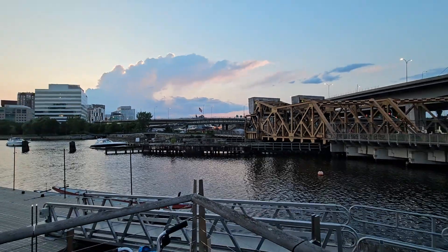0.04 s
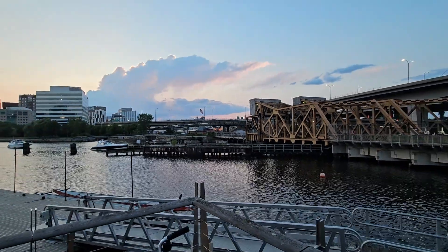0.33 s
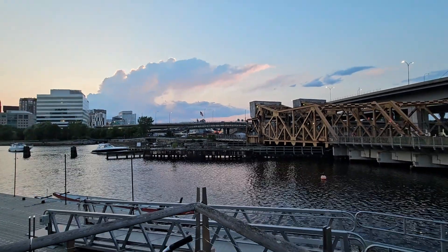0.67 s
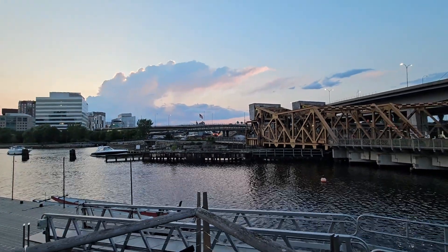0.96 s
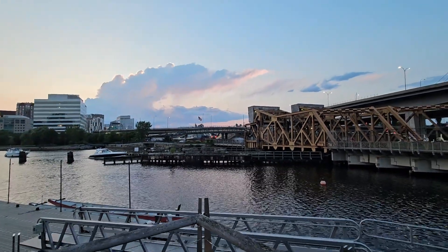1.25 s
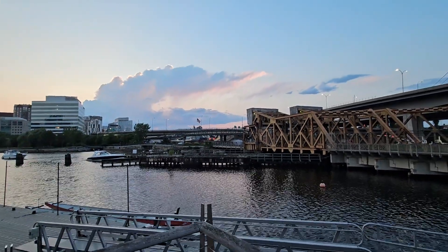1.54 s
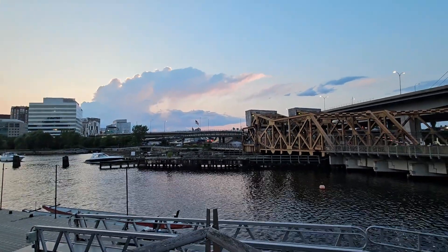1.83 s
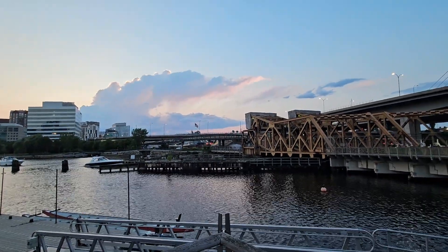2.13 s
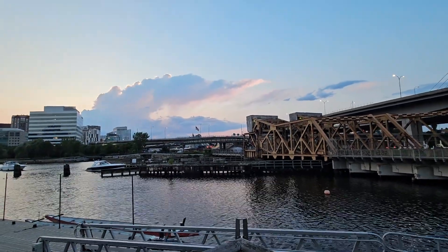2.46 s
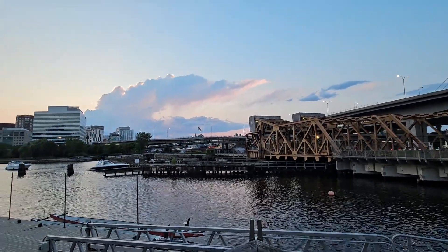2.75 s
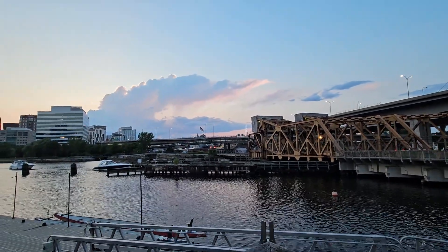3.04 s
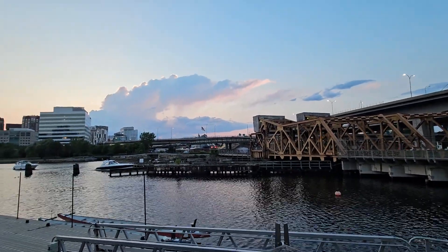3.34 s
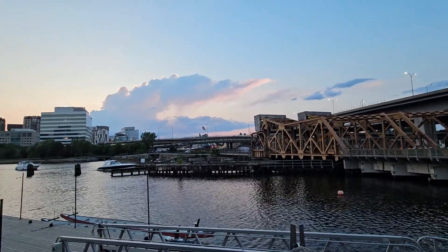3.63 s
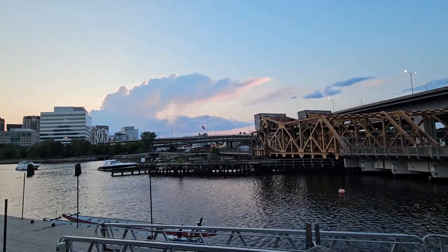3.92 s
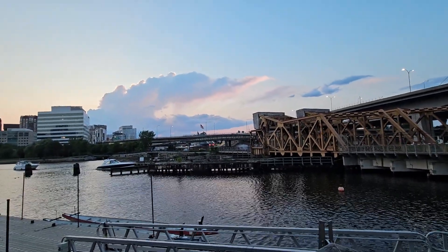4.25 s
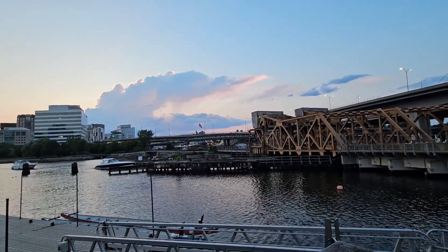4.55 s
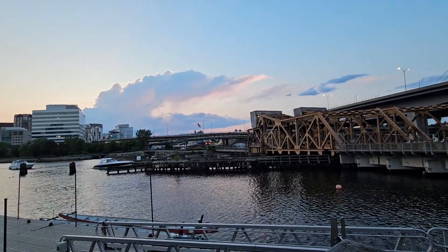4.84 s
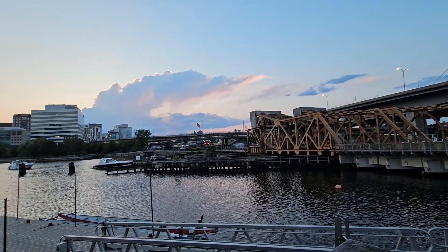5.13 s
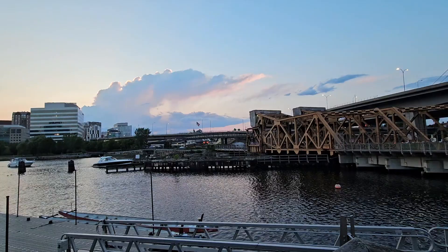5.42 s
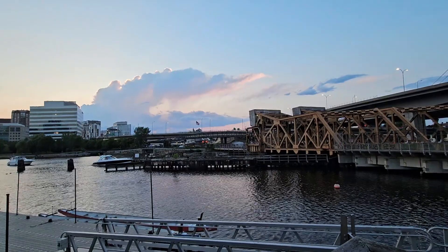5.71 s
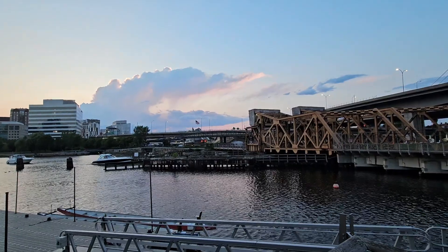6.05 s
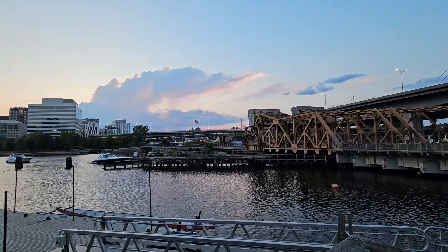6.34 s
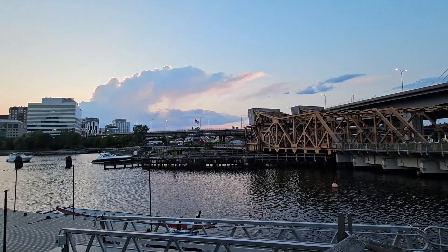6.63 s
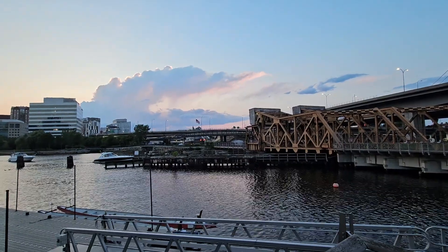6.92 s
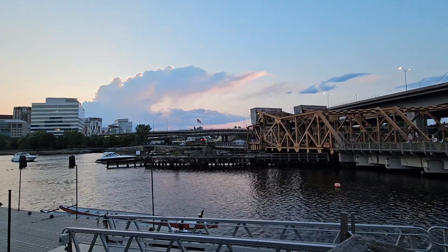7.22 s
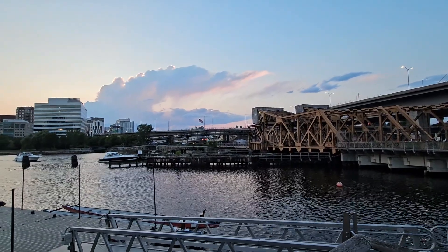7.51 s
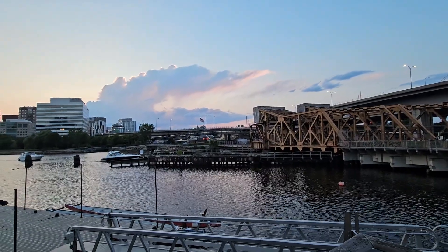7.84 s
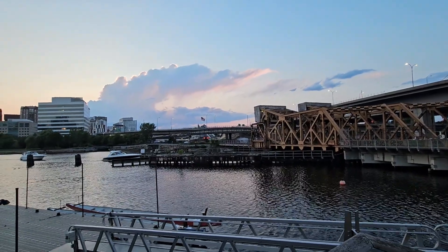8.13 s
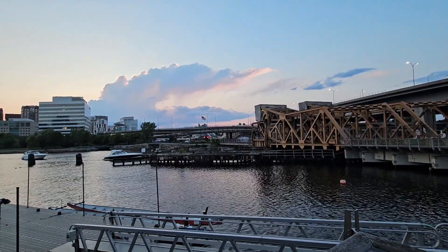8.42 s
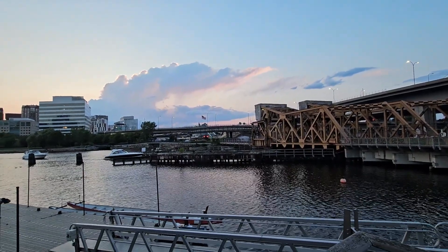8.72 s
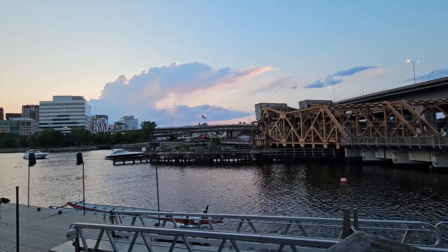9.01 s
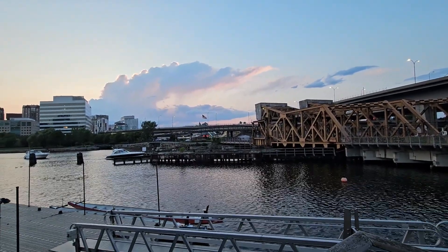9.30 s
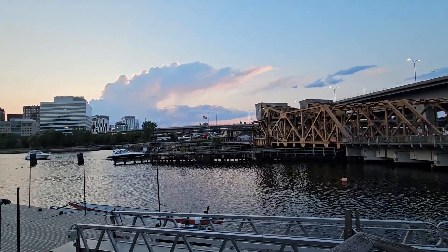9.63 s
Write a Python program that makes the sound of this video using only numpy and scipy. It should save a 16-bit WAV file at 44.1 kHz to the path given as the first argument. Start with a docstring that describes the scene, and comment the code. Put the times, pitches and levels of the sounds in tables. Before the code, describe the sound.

On a city riverbank, a heavy engine drones far away, fading in and out over deep traffic rumble and a steady wash of streets. Tyres swish along a highway bridge on the right. Low booms come early, then scattered knocks of wheels crossing a joint, with the strongest cluster near the end. Faint distant squeals and small ticks, pings and rustles near the microphone dot the stereo background.

```python
"""River bank by a highway bridge

City dusk, in stereo from the bank. A heavy engine drones far off, fading in and out on the air, over
low traffic rumble. Tyres wash in from the bridge on the right and now and then knock over a joint.
Thin pings, ticks, rustles and scuffs sound near the microphone, squeals and faint twitter farther out,
and behind it all lies the wash of the streets."""
import sys
import numpy as np
from scipy import signal
from scipy.fft import rfft, irfft, next_fast_len
from scipy.io import wavfile

SR = 44100
rng = np.random.default_rng(int(sys.argv[2]) if len(sys.argv) > 2 else 0)


def unload_wav(signal):
    """Save mono or channel-first audio to the path in sys.argv[1] as 16-bit WAV at rate SR, clipped to [-1, 1]."""
    wavfile.write(
        sys.argv[1],
        SR,
        np.round(np.clip(np.atleast_2d(signal).T, -1, 1) * 32767).astype(np.int16),
    )


N = 426447
T = np.arange(N) / SR
FROM_MIDDLE_S = T - T.mean()
FREQS = np.maximum(np.arange(N // 2 + 1) * SR / N, 1)
FFT_SIZE = next_fast_len(N, True)
FFT_HZ = np.arange(FFT_SIZE // 2 + 1) * SR / FFT_SIZE


def undb(db):
    """Decibels to gain."""
    return 10 ** (np.asarray(db) / 20)


def unit(x):
    """Scale to rms 1."""
    return x / np.sqrt(np.mean(x ** 2))


def pan(db):
    """Gains of the two sides, the left db louder than the right."""
    return undb(np.vstack([db / 2, -db / 2]))


def curves(table):
    """The columns of a curve table, one value a sample."""
    seconds, *columns = np.transpose(table)
    return [np.interp(T, seconds, column) for column in columns]


def walk(rate):
    """Smooth chance with spread 1, changing about rate times a second."""
    spectrum = rfft(rng.standard_normal(FFT_SIZE)) / (1 + (FFT_HZ / rate) ** 4)
    return unit(irfft(spectrum, FFT_SIZE))[:N]


def colour(points):
    """Gain at each frequency from (Hz, dB) points."""
    hz, db = np.transpose(points)
    return undb(np.interp(np.log(FREQS), np.log(hz), db, left=-90, right=-90))


def resonance(hz, width_hz):
    """Gain at each frequency of a steep-sided resonance."""
    return 1 / (1 + ((FREQS ** 2 - hz ** 2) / (FREQS * width_hz)) ** 2)


def resonances(bands):
    """Summed gain of (Hz, width Hz, dB) resonances."""
    return sum(undb(db) * resonance(hz, width) for hz, width, db in bands)


def stereo_spectrum(size, likeness, lag_ms):
    """White noise spectra; likeness is the share common to both sides, reaching the left lag_ms late."""
    hz = np.arange(size // 2 + 1) * SR / size
    common, *apart = rfft(rng.standard_normal((3, size)))
    direct = np.array([common * np.exp(-2j * np.pi * hz * lag_ms / 1000), common])
    return np.sqrt(likeness) * direct + np.sqrt(1 - likeness) * np.array(apart)


def noise(gain, likeness=0, lag_ms=0, pan_db=0):
    """Steady coloured stereo noise of rms 1."""
    share = np.interp(FFT_HZ, FREQS, np.broadcast_to(likeness, FREQS.shape))
    spectrum = stereo_spectrum(FFT_SIZE, share, lag_ms) * np.interp(FFT_HZ, FREQS, gain)
    return unit(irfft(spectrum, FFT_SIZE)[:, :N] * pan(pan_db))


def burst(start_s, gain, db, t60, rise_s, pan_db=0, likeness=0, lag_ms=0):
    """A track with one burst of coloured noise that swells, then dies by 60 dB in t60 seconds."""
    t, hz = np.arange(SR) / SR, np.arange(SR // 2 + 1)
    ring = unit(irfft(stereo_spectrum(SR, likeness, lag_ms) * np.interp(hz, FREQS, gain)))
    envelope = (1 - np.exp(-t / rise_s)) * undb(db - 60 * t / t60)
    start = int(start_s * SR)
    out = np.zeros((2, N))
    out[:, start:start + SR] = (ring * envelope * pan(pan_db))[:, :N - start]
    return out


def turning(hz, wander_hz, rate):
    """Phase of a machine whose speed wanders a little."""
    return 2 * np.pi * (np.cumsum(hz + wander_hz * walk(rate)) / SR + rng.random())


def nearness(closest_s, rise_s, fall_s):
    """Gain of a source that comes closest and leaves again."""
    return 1 / (1 + ((T - closest_s) / np.where(T < closest_s, rise_s, fall_s)) ** 2)


# The far engine's firing tone and its octave as they reach the bank.
# Each row: time in seconds, relative level in dB.
FIRING_FADES = [(0, -24), (0.2, -29), (0.42, -36.5), (0.66, -29.5), (0.74, -24.5), (0.9, -21.5),
                (1.25, -16), (1.52, -15), (1.6, -17.5), (1.88, -14.5), (2.06, -15), (2.10, -20.5),
                (2.35, -23.5), (2.87, -23), (3.0, -29), (3.35, -28), (3.68, -27.5), (3.72, -22),
                (3.86, -25), (4.42, -22), (4.46, -37), (4.52, -31.5), (4.58, -36), (4.66, -24),
                (4.87, -25.5), (5.45, -20), (5.56, -17.5), (5.86, -19.5), (5.95, -25.5), (6.17, -20.5),
                (6.95, -28), (7.1, -38), (7.25, -44), (7.4, -30.5), (7.68, -23), (8.29, -18), (9.37, -17),
                (9.67, -18)]
OCTAVE_FADES = [(0, -45), (0.6, -39), (1.3, -48.5), (1.8, -33), (2.15, -36.5), (2.37, -42), (2.62, -33.5),
                (3.1, -33), (4.0, -42.5), (4.6, -62), (5.6, -29.5), (6.35, -33), (6.7, -40), (7.6, -39),
                (7.85, -33.5), (8.3, -31.5), (8.8, -38.5), (9.67, -35)]
# Its weaker overtones. Each row: multiple of the firing tone, level midway through in dB.
OVERTONES = [(3, -50.5), (4, -56.5), (5, -63)]
FIRING_HZ = 90.1


def engine_drone(scatter_db=-38, clearing_db_per_s=0.63):
    """A far heavy engine: tone and octave fade separately as their paths over the water interfere."""
    (tone_db,), (octave_db,) = curves(FIRING_FADES), curves(OCTAVE_FADES)
    phase = turning(FIRING_HZ, wander_hz=.1, rate=1.31) + np.array([[-.105], [.105]])  # right side first
    out = undb(tone_db + 0.5 * walk(18)) * np.sin(phase)
    out += undb(octave_db - 1.9) * np.sin(2 * phase)
    # A weaker, wavering path over the water beats against the direct tone.
    out += undb(scatter_db) * (walk(15) * np.sin(phase) + walk(15) * np.cos(phase)) / np.sqrt(2)
    for multiple, db in OVERTONES:
        level_db = db + clearing_db_per_s * FROM_MIDDLE_S + 1.5 * walk(4.8)
        out += undb(level_db) * np.sin(multiple * phase)
    sway_db = .55 + .3 * walk(.7)  # the tone drifts a little between the sides
    return np.sqrt(2) * out * pan(sway_db)


# The deep rumble at the bank, steady between its lulls. Each row: time in seconds, relative level in dB.
RUMBLE_LEVEL = [(0, -45), (0.2, -33), (0.7, -27.5), (1.52, -26), (1.62, -38), (1.85, -26), (2.06, -24.5),
                (2.2, -47), (2.52, -45), (2.8, -23.5), (3.2, -34), (3.5, -32.5), (4.07, -43.5),
                (4.5, -40.5), (5.2, -44.5), (5.3, -33), (5.6, -28.5), (5.85, -26.5), (5.98, -35.5),
                (6.3, -28.5), (7.0, -28), (7.6, -28), (9.67, -29.5)]
# Far exhaust noise, deep and upper. Each row: frequency in Hz, relative level in dB.
DEEP_SPECTRUM = [(15, -19.5), (28, -7), (42, 1), (70, 1.5), (95, -11), (130, -20.5), (250, -55.5)]
UPPER_SPECTRUM = [(60, -18), (105, -1), (165, -0.5), (250, -6.5), (300, -12), (600, -23), (1500, -58.5)]
# Other engines humming in the distance. Each row: pitch in Hz, base level in dB.
ENGINE_HUMS = [(29, -46), (42.6, -28.5), (57.5, -34.5), (69, -41), (112.5, -49.5), (137, -50.5), (156, -46),
               (218, -50), (240, -52), (337, -56.5)]
# Heavy vehicles swelling in the low mids. Each row: loudest moment, rise and fall in seconds,
# centre and width in Hz, peak level in dB.
TRUCKS = [(1.5, 0.45, 0.56, 512, 29.95, -51.5), (2.72, 0.16, 0.19, 328.5, 129, -42),
          (4.4, .4, .5, 384, 59.8, -52)]
NO_LULL_DB, BUSIER_DB_PER_S = -25.5, 0.2151  # the bridge slowly gets busier


def traffic_rumble(upper_lull_share=0.28):
    """Exhaust noise and hums of far vehicles sink together in lulls; long waves reach both sides alike."""
    (deep_db,) = curves(RUMBLE_LEVEL)
    lull_db = deep_db - NO_LULL_DB
    deep = noise(colour(DEEP_SPECTRUM), likeness=0.9, lag_ms=0.21, pan_db=2)
    deep *= undb(deep_db - 3.5 + 0.6 * walk(6))
    upper = noise(colour(UPPER_SPECTRUM), likeness=0.88, lag_ms=0.25)
    upper *= undb(-34.5 + 0.2 * FROM_MIDDLE_S + upper_lull_share * lull_db + 1.3 * walk(13))
    out = deep + upper
    for hz, db in ENGINE_HUMS:
        lull_share = 1 if hz < FIRING_HZ else upper_lull_share
        swell_db = lull_share * lull_db + BUSIER_DB_PER_S * FROM_MIDDLE_S + 0.38 * walk(2.9)
        out += undb(db + swell_db) * np.sqrt(2) * np.sin(turning(hz, wander_hz=0.25, rate=0.81))
    for s, rise, fall, hz, width, db in TRUCKS:
        truck = noise(resonance(hz, width), likeness=0.81, lag_ms=0.25)
        out += truck * undb(db) * nearness(s, rise, fall)
    return out


# Tyre roar and hiss, heard from beside the bridge. Each row: frequency in Hz, relative level in dB.
ROAR_SPECTRUM = [(150, -18), (400, 2), (600, -2), (800, 4.5), (1100, 1), (1270, 3.5), (1460, 1), (1750, 0),
                 (2050, -1.5), (2500, -10), (3200, -17), (5000, -46)]
HISS_SPECTRUM = [(1200, -13.5), (2500, 4), (4300, 2.5), (6000, -5.5), (8500, -6.5), (10000, -28.5),
                 (15000, -33)]
# The whine of the tread. Each row: centre and width in Hz, relative level in dB.
TREAD_BANDS = [(1970, 98, 1), (2820, 590, -12.5)]
# Single vehicles standing out on the bridge. Each row: loudest moment, rise and fall in seconds,
# then levels of roar, hiss and whine in dB.
PASSES = [(4.42, 0.11, 0.35, -41.5, -55, -51.5), (5.88, 0.31, 0.33, -43, -69, -51),
          (7.72, 0.11, 0.09, -48.5, -64, -54), (8.5, 0.31, 0.8, -49, -57, -58)]


def tyres(steady_roar_db=-42.5, steady_hiss_db=-59):
    """Tyres roll over the bridge on the right; each pass adds its power to the steady flow."""
    flow = undb(BUSIER_DB_PER_S * FROM_MIDDLE_S)
    power = np.outer([undb(steady_roar_db), undb(steady_hiss_db), 0], flow) ** 2
    for s, rise, fall, *levels_db in PASSES:
        power += np.outer(undb(levels_db), nearness(s, rise, fall)) ** 2
    roar_gain, hiss_gain, whine_gain = np.sqrt(power)
    direct_share = 1 / (1 + (FREQS / 2100) ** 6)  # the higher the roar, the more scattered it arrives
    roar = noise(colour(ROAR_SPECTRUM), direct_share, lag_ms=0.37, pan_db=-6) * undb(0.65 * walk(11))
    hiss = noise(colour(HISS_SPECTRUM), likeness=0.024, pan_db=0.1) * undb(1.1 * walk(7.6))
    whine = noise(resonances(TREAD_BANDS), pan_db=-10.5)
    return roar * roar_gain + hiss * hiss_gain + whine * whine_gain


# Wheels crossing a joint up on the bridge. Each row: start in seconds, levels of deck ring, dull body
# and plate clank in dB, decay time in seconds.
JOINT_HITS = [(2.61, -56, -44, -70, .7), (3.1, -60, -34, -71, .4), (5.03, -42, -60, -71, 0.95),
              (5.36, -37.5, -54, -63, 0.47), (6.37, -34, -48, -60, 0.25), (6.48, -39, -33, -60, 0.39),
              (8.99, -36, -55, -70, 0.23), (9.085, -36, -42.5, -70, 0.45), (9.12, -32.5, -26, -36, 0.31),
              (9.17, -35, -33.5, -59, 0.35), (9.225, -45, -28.5, -59, 0.33), (9.32, -40, -50, -70, .25)]
# Modes of the deck and the joint's steel plate. Each row: centre and width in Hz, relative level in dB.
DECK_MODES = [(615, 130, -1), (780, 86, 2.5), (1020, 120, -11), (1280, 120, -13.5)]
PLATE_MODES = [(1520, 180, -3.5), (1850, 180, -3.5), (2080, 110, 1)]
# The dull body of a knock. Each row: frequency in Hz, relative level in dB.
BODY_SPECTRUM = [(130, -13), (245, 15.5), (320, 2.5), (450, 0), (620, 1.5), (950, -8.5), (1500, -12),
                 (2100, -16.5), (2800, -34)]
# Deep booms under heavy loads. Each row: start in seconds, level in dB.
BOOMS = [(1.489, -27), (1.729, -23), (2.031, -25), (3.155, -20), (4.471, -30)]


def joint_knocks():
    """Wheels strike a joint: the deck rings, a hard hit clanks the plate, heavy loads make it boom."""
    deck, plate, body = resonances(DECK_MODES), resonances(PLATE_MODES), colour(BODY_SPECTRUM)
    out = np.zeros((2, N))
    for s, ring_db, body_db, clank_db, t60 in JOINT_HITS:
        out += burst(s, deck, ring_db, t60, rise_s=0.0064, pan_db=-3, likeness=0.7, lag_ms=0.27)
        out += burst(s, body, body_db, t60, rise_s=0.0051, pan_db=1, likeness=1, lag_ms=0.31)
        out += burst(s, plate, clank_db, t60, rise_s=0.012, pan_db=-4)
    boom = resonance(hz=85, width_hz=64)
    for s, db in BOOMS:
        out += burst(s, boom, db, t60=0.43, rise_s=0.0055, likeness=0.86, lag_ms=0.32)
    return out


# Squeals far off to the right. Each row: start in seconds, pitch in Hz, level in dB, decay in seconds.
SQUEALS = [(1.05, 2840, -53.5, 0.91), (2.57, 2150, -43, .45), (3.51, 2130, -43.5, 0.45),
           (4.099, 2600, -52, 0.96), (4.951, 890, -37, 0.41), (8.879, 2500, -48, 0.5),
           (8.90, 2730, -58, 0.38)]


def far_squeals():
    """Narrow bands of noise swell and fade; the longer ones also rise more slowly."""
    return sum(burst(s, resonance(hz, .075 * hz), db, t60, rise_s=0.091 * t60, pan_db=-11.5)
               for s, hz, db, t60 in SQUEALS)


# One thin whistle, right of centre. Each row: time in seconds, pitch in Hz, level in dB.
WHISTLE_CURVE = [(8.79, 7400, -78), (8.826, 7380, -46.5), (8.87, 7410, -57), (8.93, 7390, -57),
                 (9.01, 7390, -68), (9.03, 7400, -62.5), (9.085, 7350, -59), (9.12, 7300, -56),
                 (9.21, 7430, -66), (9.35, 7320, -79.5)]


def whistle(left_lag_ms=.06):
    """A nearly pure squeal, perhaps a far brake, that catches and sags in pitch as it dies."""
    hz, db = curves(WHISTLE_CURVE)
    sounding = (T > WHISTLE_CURVE[0][0]) & (T < WHISTLE_CURVE[-1][0])
    lag_s = np.array([[left_lag_ms / 1000], [0]])
    phase = turning(hz, wander_hz=14, rate=60) - 2 * np.pi * hz * lag_s
    return np.sqrt(2) * np.sin(phase) * sounding * undb(db + 1.6 * walk(45)) * pan(-3.5)


# Pings nearby, a little to the right. Each row: start in seconds, pitch and width in Hz, level in dB,
# decay and rise in seconds.
PINGS = [(2.69, 9455, 45, -63.5, 1.5, 0.09), (3.97, 9530, 100, -68.5, 1.1, .02),
         (6.925, 2400, 700, -47, .14, .003), (6.93, 8740, 40, -65, 1.4, .004),
         (7.72, 9310, 140, -55, .85, 0.035), (8.82, 9640, 60, -65, 0.77, .06)]


def pings():
    """Thin metallic rings trail off over the water."""
    return sum(burst(s, resonance(hz, width), db, t60, rise, pan_db=-2.5)
               for s, hz, width, db, t60, rise in PINGS)


# Ticks close to the microphone. Each row: start in seconds, level in dB, left minus right in dB.
TICKS = [(1.93, -60, -4), (2.819, -60, -1), (4.79, -54, 0), (6.925, -46.5, -2)]


def ticks():
    """Sharp, short bursts of broad treble noise."""
    band = resonance(hz=5630, width_hz=4800)
    return sum(burst(s, band, db, t60=0.14, rise_s=0.0057, pan_db=pan_db) for s, db, pan_db in TICKS)


# Rustles close by, near the centre. Each row: start in seconds, level in dB, decay in seconds.
RUSTLES = [(1.0, -68, .4), (1.92, -66, 0.62), (2.52, -71, 1.1), (2.90, -65, 0.51), (3.62, -61, 0.55),
           (3.71, -69, 0.99), (4.76, -58, 0.23), (5.3, -78, 1.5), (8.53, -72, 0.47)]


def rustles():
    """Soft puffs of very high noise."""
    band = resonance(hz=12600, width_hz=7000)
    return sum(burst(s, band, db, t60, rise_s=.025, pan_db=-0.5) for s, db, t60 in RUSTLES)


# Scuffs nearby. Each row: start in seconds, level in dB, decay in seconds, left minus right in dB.
SCUFFS = [(.16, -63.5, .7, 3), (1.84, -59.5, 0.72, -4), (2.17, -67, .8, -8), (2.79, -61.5, 0.79, -7),
          (6.1, -67, 1.2, -3), (7.63, -64.5, .7, 0), (8.19, -60, 0.71, -1), (9.13, -60, 1.4, 0)]
# The bands they sound through. Each row: centre and width in Hz, relative level in dB.
SCUFF_BANDS = [(6300, 400, -8.5), (7400, 450, 4), (6600, 3100, -13)]


def scuffs():
    """Brief hisses with a soft onset, all of one colour."""
    bands = resonances(SCUFF_BANDS)
    return sum(burst(s, bands, db, t60, rise_s=0.038, pan_db=pan_db) for s, db, t60, pan_db in SCUFFS)


# Faint flurries far off. Each row: loudest moment, rise and fall in seconds, relative level in dB.
TWITTER_FLURRIES = [(1.88, .06, .1, -71), (3.42, .2, 0.22, -67), (9.3, .1, .15, -68)]
# Their two bands. Each row: centre and width in Hz, relative level in dB.
TWITTER_BANDS = [(6270, 450, -2), (7650, 500, -3.5)]


def twitter(flicker_db=3):
    """High twitter, blurred by distance into a flickering shimmer."""
    swell = sum(undb(db) * nearness(s, rise, fall) ** 2 for s, rise, fall, db in TWITTER_FLURRIES)
    return swell * sum(noise(resonance(hz, width)) * undb(db + flicker_db * walk(25))
                       for hz, width, db in TWITTER_BANDS)


def sizzle(from_s=0.71, to_s=5.7, fade_s=.3, level_db=-83):
    """A fine, flickering hiss close by on the left fades in and out."""
    fade = np.clip(np.minimum(T - from_s, to_s - T) / fade_s, 0, 1)
    hiss = noise(resonance(hz=10500, width_hz=10000), pan_db=3.5)
    return hiss * fade * undb(level_db + 1.3 * walk(8))


# The streets all around the bank. Each row: frequency in Hz, relative level in dB.
STREET_SPECTRUM = [(100, -1.5), (270, 0.5), (400, 0.5), (470, -1), (580, 3), (800, -3), (1050, 0.5),
                   (1500, -6), (2000, -17.5), (2700, -21.5), (4000, -33), (5700, -42), (6300, -38),
                   (6850, -48), (7350, -31.5), (7900, -41.5), (8800, -42), (10000, -58.5), (15500, -54)]


def streets(base_db=-40, easing_db_per_s=0.31, lull_share=0.034, alike_hz=680):
    """The wash of the streets slowly eases off, a little left; only its bass is alike on both sides."""
    (deep_db,) = curves(RUMBLE_LEVEL)
    lull_db = deep_db - NO_LULL_DB
    level_db = base_db - easing_db_per_s * FROM_MIDDLE_S + lull_share * lull_db + 0.39 * walk(1.7)
    likeness = np.exp(-(FREQS / alike_hz) ** 2)
    return noise(colour(STREET_SPECTRUM), likeness, lag_ms=0.086, pan_db=1) * undb(level_db)


def scene():
    """Everything that reaches the microphone on the bank."""
    traffic = engine_drone() + traffic_rumble() + tyres() + streets() + joint_knocks()
    small_sounds = pings() + far_squeals() + ticks() + rustles() + scuffs() + whistle()
    return traffic + small_sounds + twitter() + sizzle()


def record(dry):
    """A 4 ms fade-in; the recorder cuts the top above 15.7 kHz."""
    lowpass = signal.ellip(8, .2, 70, 15700, fs=SR, output="sos")
    return signal.sosfilt(lowpass, dry * np.minimum(T / .004, 1))


dry = scene()
out = record(dry)
unload_wav(out)
```